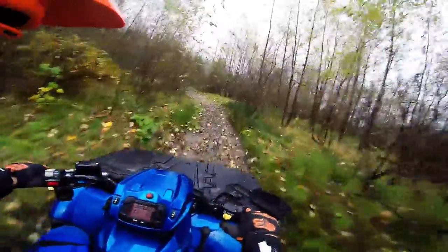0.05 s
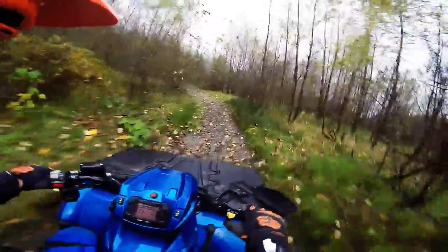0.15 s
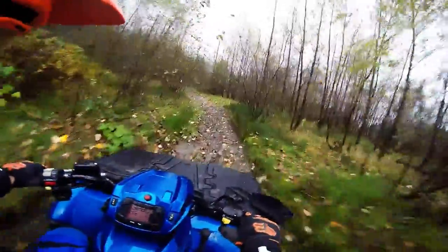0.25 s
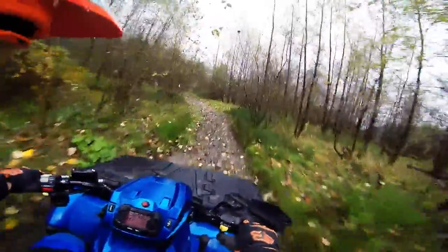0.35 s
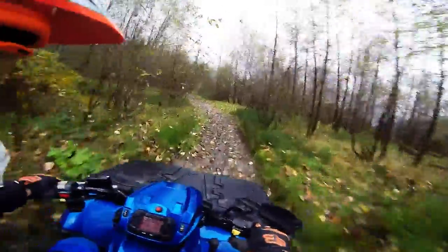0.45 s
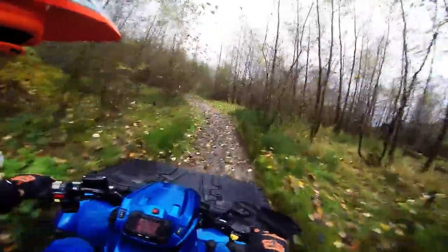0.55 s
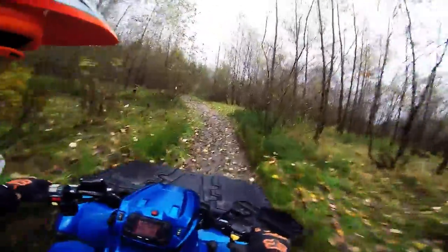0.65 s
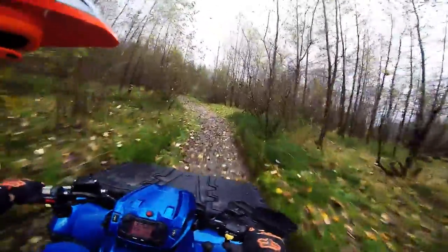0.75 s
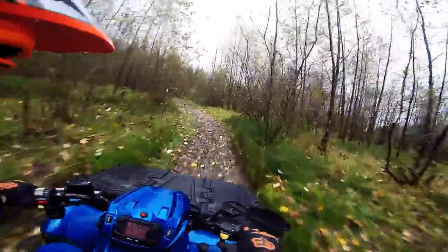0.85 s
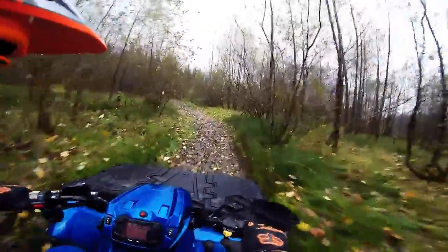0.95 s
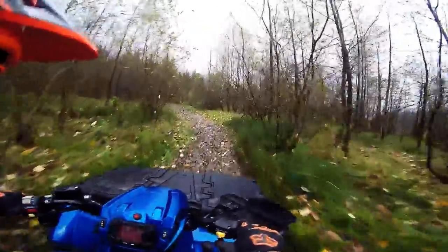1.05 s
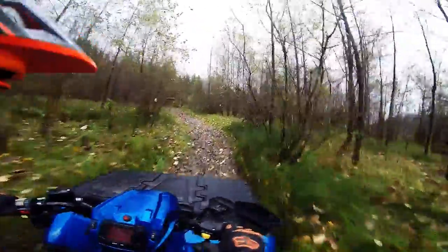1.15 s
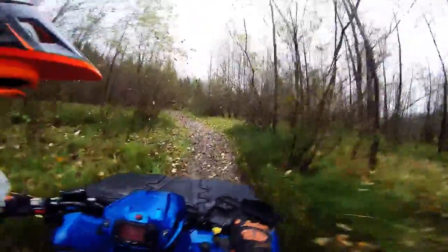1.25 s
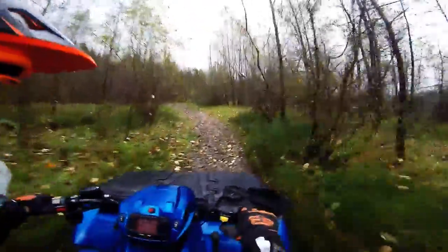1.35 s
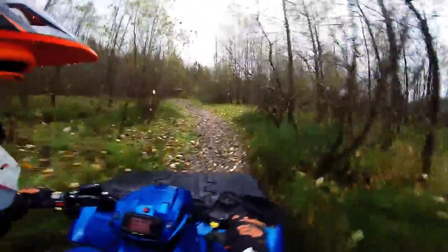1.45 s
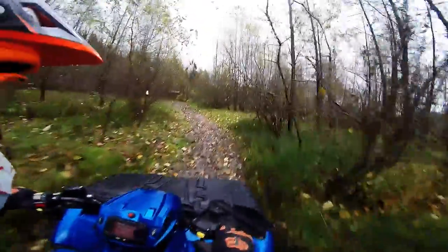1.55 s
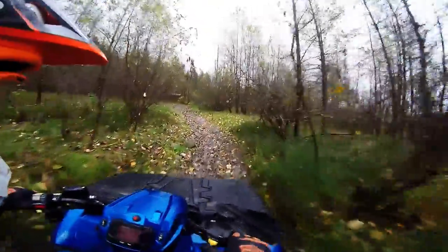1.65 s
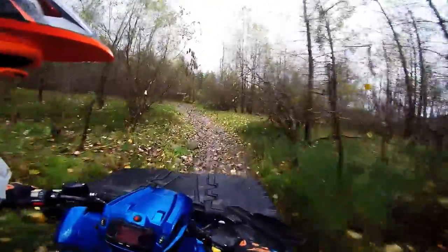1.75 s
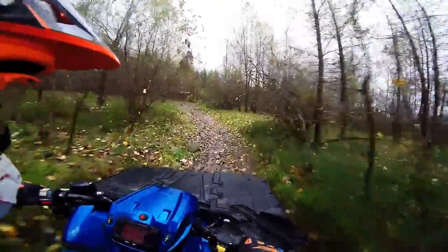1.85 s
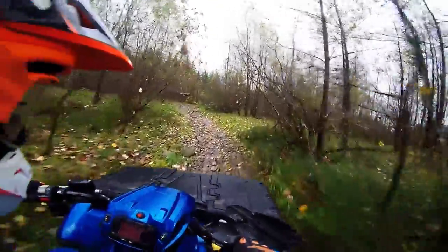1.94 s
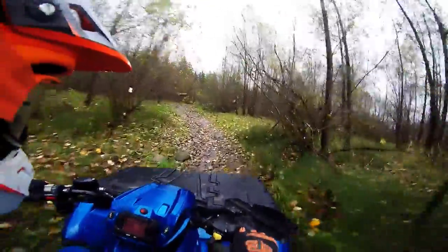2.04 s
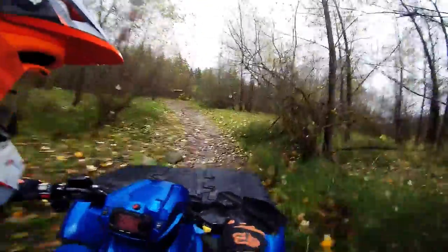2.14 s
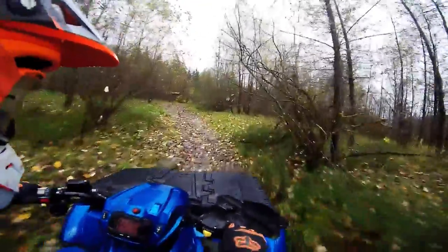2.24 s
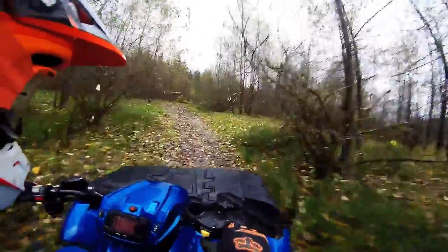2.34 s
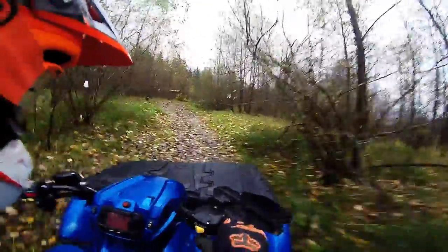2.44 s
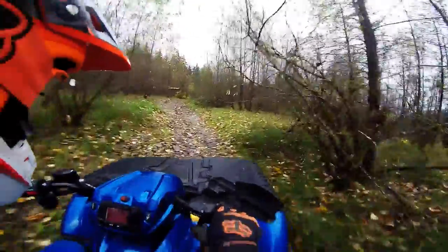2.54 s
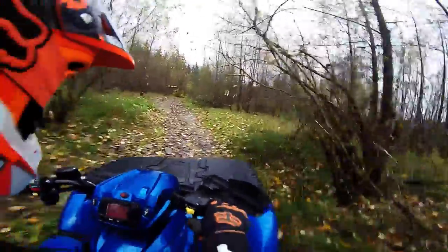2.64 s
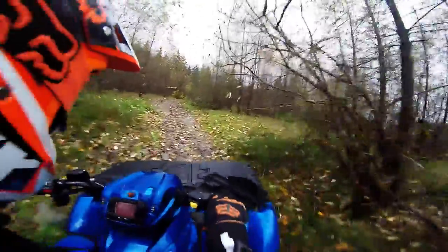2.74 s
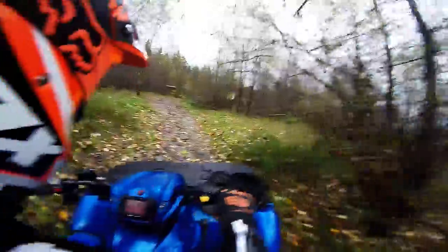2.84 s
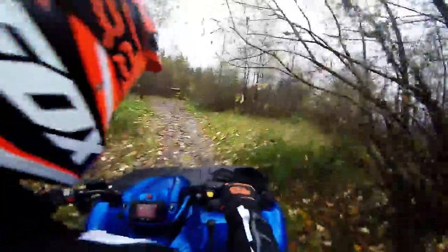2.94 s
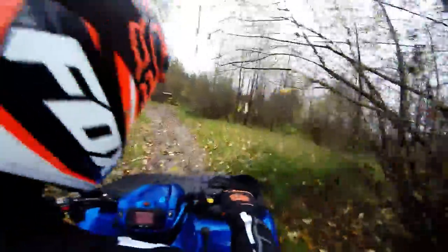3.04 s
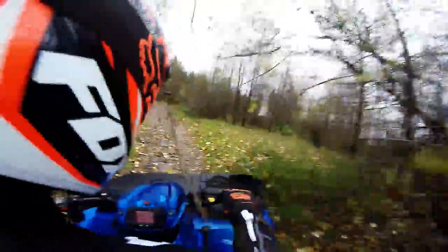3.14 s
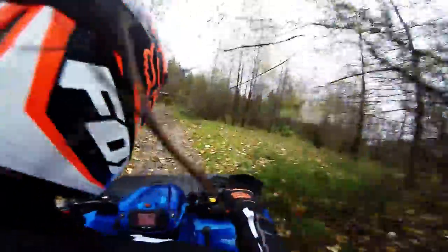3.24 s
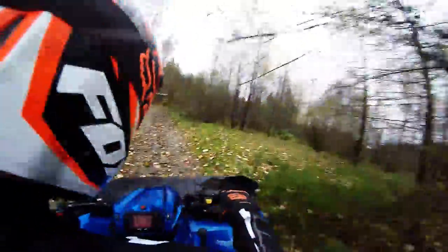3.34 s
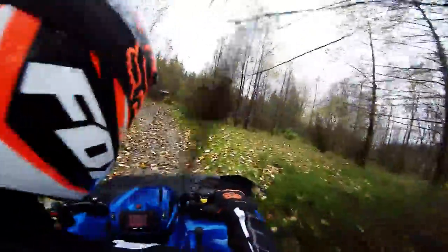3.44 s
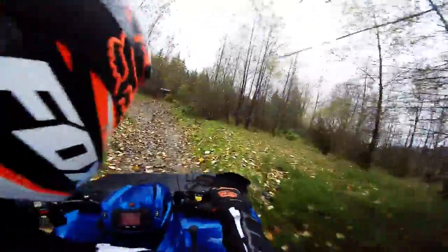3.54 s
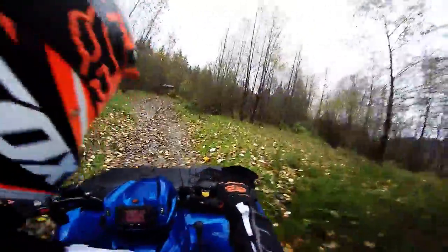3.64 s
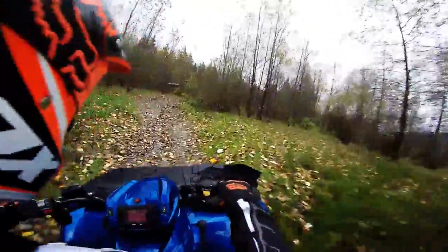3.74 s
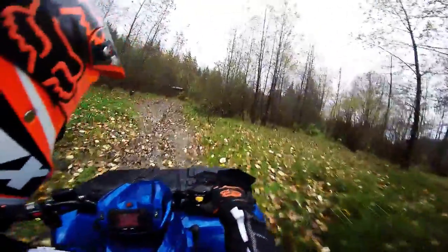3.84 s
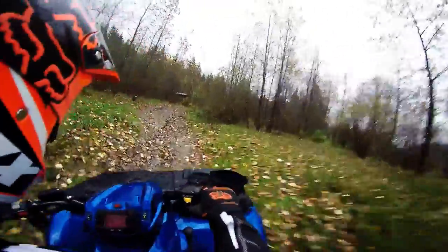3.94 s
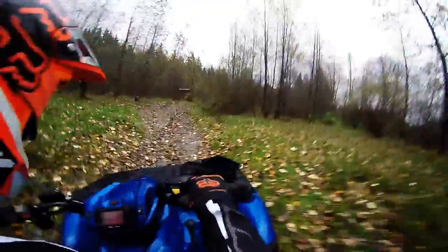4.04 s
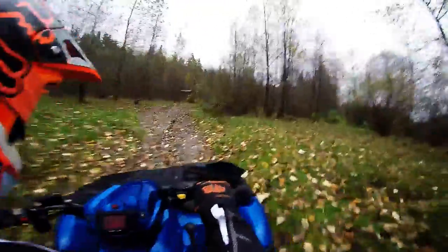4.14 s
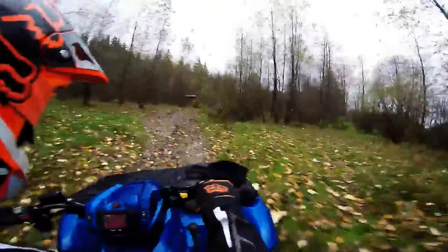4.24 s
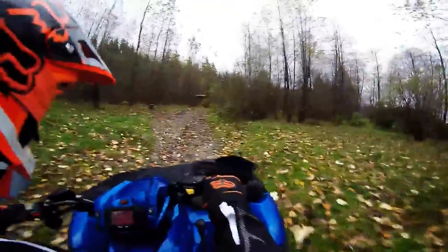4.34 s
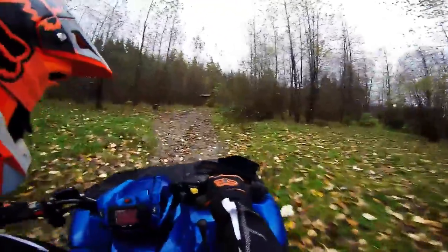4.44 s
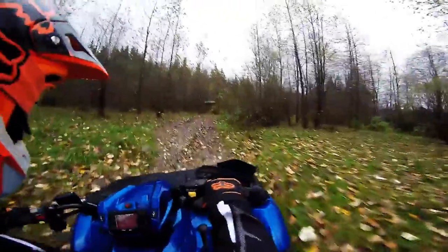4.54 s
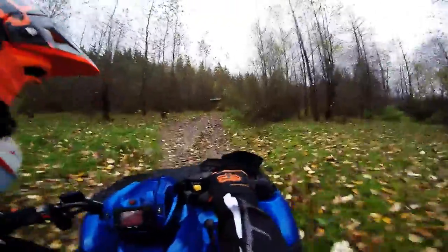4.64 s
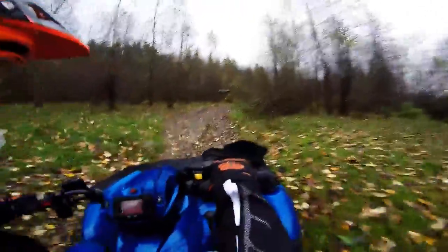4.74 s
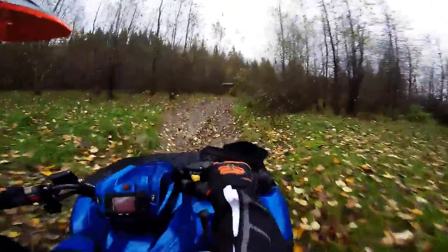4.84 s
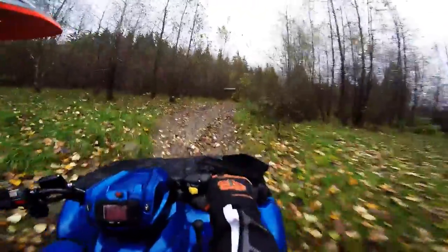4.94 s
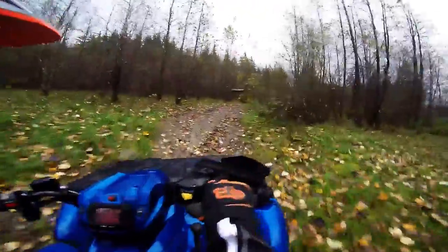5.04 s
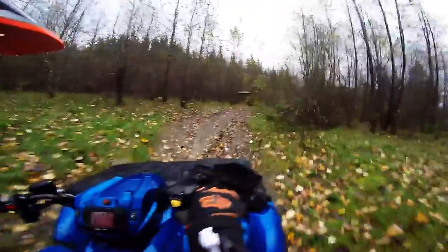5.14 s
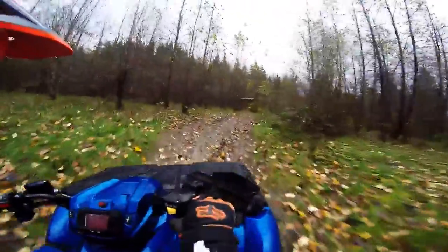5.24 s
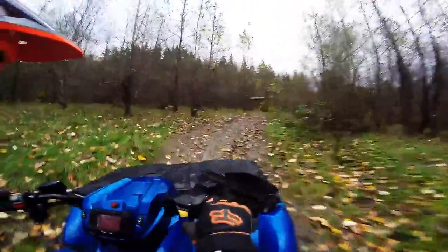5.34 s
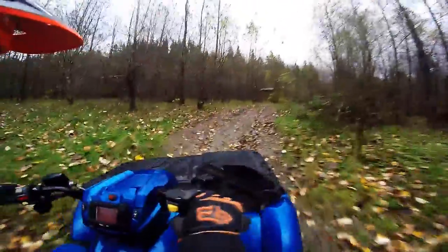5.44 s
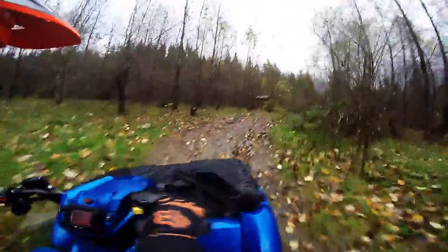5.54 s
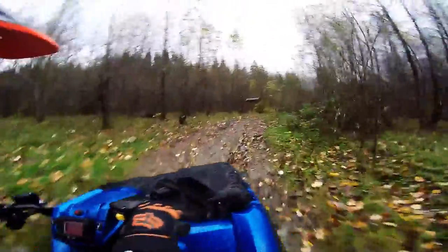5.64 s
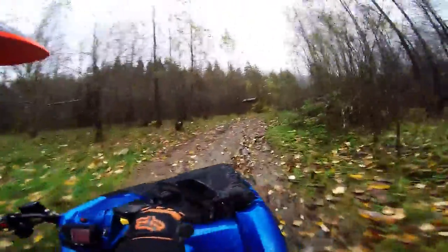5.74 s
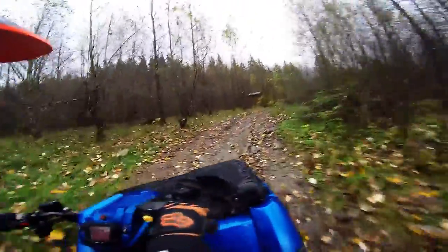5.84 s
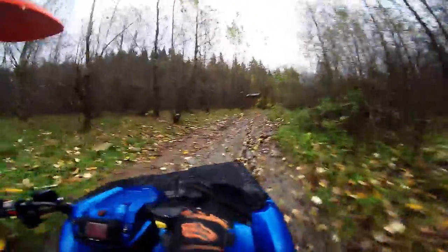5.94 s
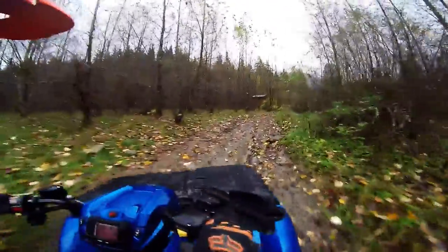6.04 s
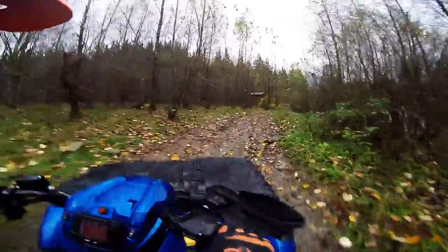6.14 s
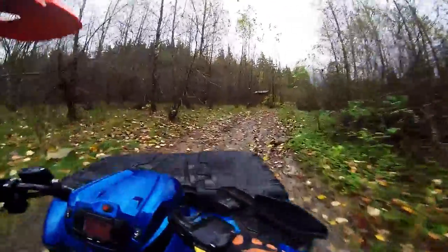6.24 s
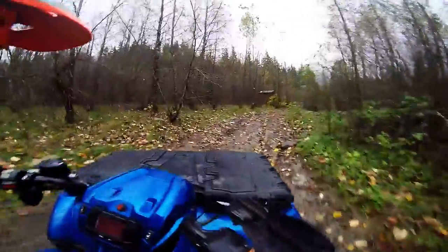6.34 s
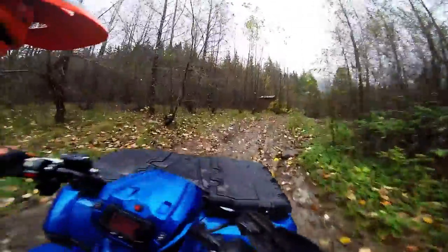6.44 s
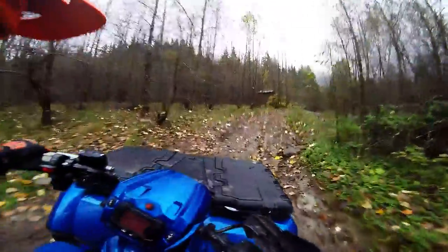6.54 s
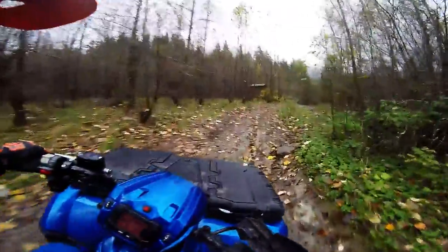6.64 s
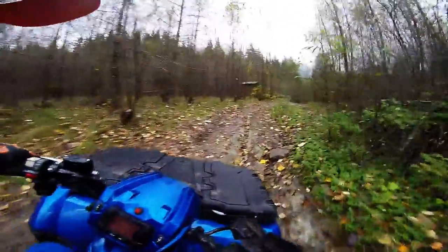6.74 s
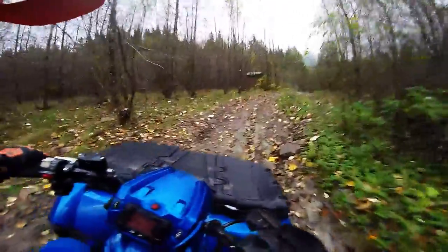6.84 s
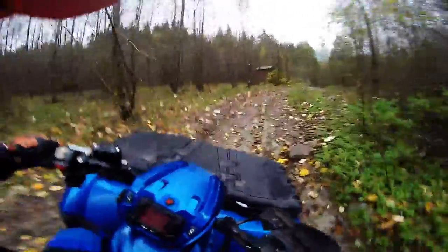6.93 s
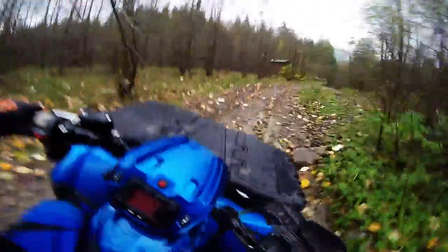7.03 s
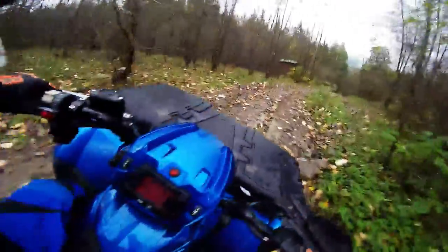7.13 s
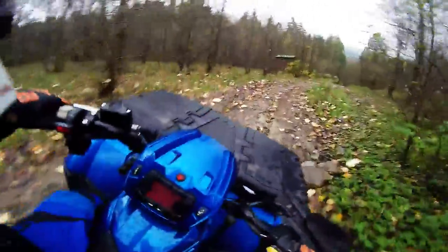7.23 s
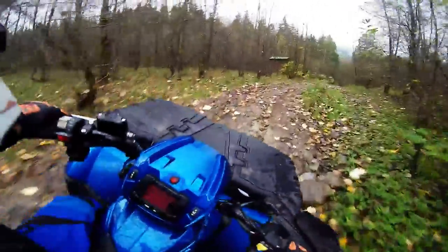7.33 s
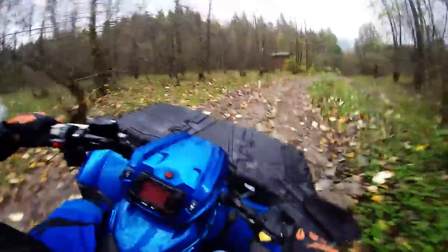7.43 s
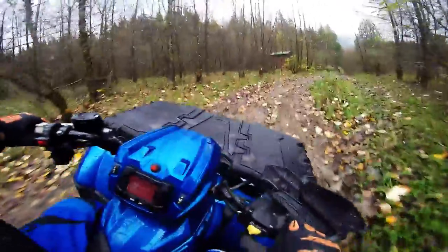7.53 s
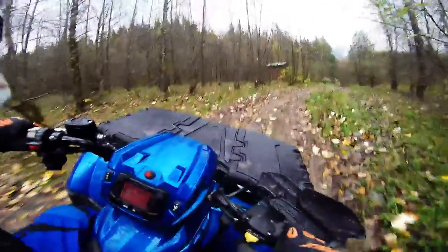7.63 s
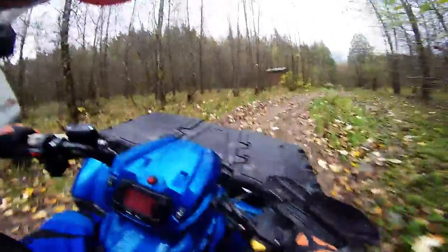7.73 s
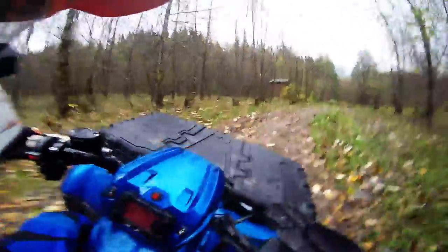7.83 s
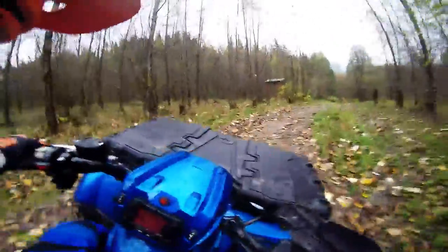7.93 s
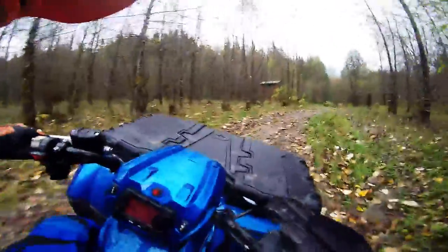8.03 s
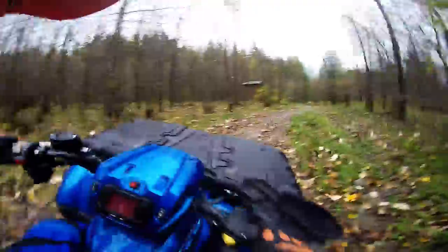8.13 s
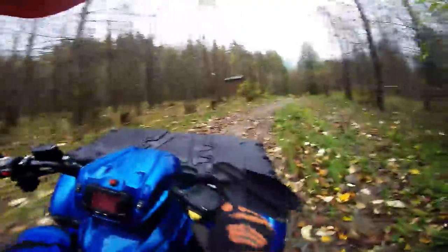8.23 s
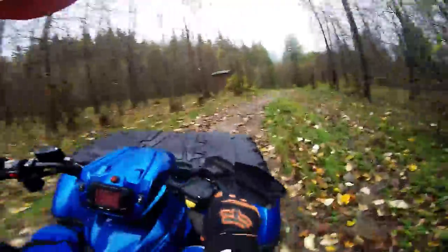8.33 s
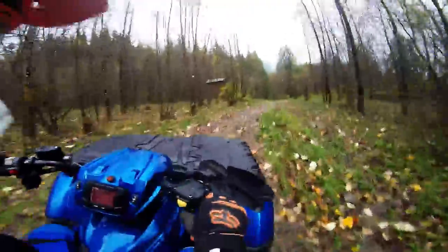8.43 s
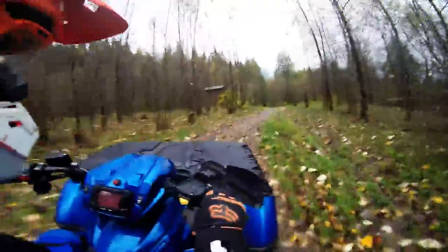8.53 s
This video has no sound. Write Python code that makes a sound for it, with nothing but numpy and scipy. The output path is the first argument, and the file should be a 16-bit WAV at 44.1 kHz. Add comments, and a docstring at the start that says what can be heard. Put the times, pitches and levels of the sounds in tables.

```python
"""A dirt trail, from a moving quad bike: a small camera in a closed plastic case beside the rider's helmet.
Exhaust orders hum over wind buffeting and suspension jolts; engine clatter hisses in the case's
resonances. Leaves brush past, close to the microphone. About three seconds in, a branch thuds on the
helmet and scrapes right over the case; the camera's gain control ducks and slowly recovers."""
import sys
import numpy as np
from scipy import signal
from scipy.fft import rfft, irfft, next_fast_len
from scipy.io import wavfile
from scipy.ndimage import uniform_filter1d, map_coordinates

SR = 44100
rng = np.random.default_rng(int(sys.argv[2]) if len(sys.argv) > 2 else 0)


def wrap_up_sound(samples):
    """Save the sound to the file named by the first command line argument, as 16-bit audio."""
    columns = np.atleast_2d(samples).T
    # keep every value between -1 and 1, then stretch to whole-number steps
    tamed = np.clip(columns, -1, 1)
    steps = np.round(tamed * 32767).astype(np.int16)
    wavfile.write(sys.argv[1], SR, steps)


N = 378378


def amp(db):
    """Gain of a level in dB."""
    return 10 ** (np.asarray(db) / 20)


def unit(x):
    """x brought to rms 1."""
    return x / np.sqrt(np.mean(x ** 2) + 1e-20)


def curves(rows):
    """One value per sample for each column after the time."""
    times, *columns = np.transpose(rows)
    return [np.interp(np.arange(N) / SR, times, column) for column in columns]


def wobble(rate):
    """A smooth random curve, rate knots a second."""
    knots = rng.standard_normal(int(N * rate / SR) + 4)
    at = np.arange(0, N + 32, 32)
    return np.interp(np.arange(N), at, map_coordinates(knots, [at * rate / SR]))


def patchy(depth_db):
    """White noise whose gain drifts in patches of time and frequency."""
    spectra = signal.stft(rng.standard_normal(N + 512), nperseg=512)[2]
    patches = uniform_filter1d(rng.standard_normal(spectra.shape), size=4, axis=0)
    patches = uniform_filter1d(patches, size=10, axis=1)
    return unit(signal.istft(spectra * amp(depth_db * unit(patches)), nperseg=512)[1][:N])


def filtered(x, response):
    """x through a complex frequency response."""
    size = next_fast_len(len(x) + 8192)
    return irfft(rfft(x, size) * response(np.fft.rfftfreq(size, 1 / SR)), size)[:len(x)]


def colour(points):
    """The response through (f/Hz, level/dB) points on a log frequency axis."""
    f, db = np.transpose(points)
    return lambda hz: amp(np.interp(np.log(hz + 1), np.log(f + 1), db))


def peak(f, hz, width):
    """One causal resonance at hz."""
    return 1j * f * width / (hz * hz - f * f + 1j * f * width)


def case(f):
    """Response of the plastic case round the microphone: modes of alternating sign."""
    # case resonances: f/Hz, width/Hz, level/dB
    modes = [(682, 310, -5.5), (1190, 253, 1.5), (1796, 244, -2.5), (2498, 188, 1.5), (2782, 170, -2),
             (3260, 360, -3.5), (4420, 217, -4.5), (4815, 96, -4), (5386, 400, -5), (6440, 500, -8),
             (7180, 450, -6), (9500, 3700, -11), (14700, 2100, -17)]
    return sum((-1) ** k * amp(db) * peak(f, hz, width) for k, (hz, width, db) in enumerate(modes))


def driven(hz, load_db, cruise_db, db_per_hz, load_slope, cruise_hz=26.5):
    """A gain that grows with revs and load."""
    return amp(cruise_db + db_per_hz * (hz - cruise_hz) + load_slope * load_db)


def exhaust(cycle, hz, load_db):
    """Multiples of the engine cycle rate hum through the pipe, each swaying in level and phase."""
    # orders before the pipe: multiple, level/dB, dB gained per dB of load
    orders = [(1, -43.5, 2.5), (2, -32, 0.13), (3, -44.5, 1.8), (4, -45, -0.3), (5, -31.5, 0.2),
              (6, -40, 0.26), (7, -49.5, 0), (8, -51, 2), (9, -59, .6), (10, -54.5, 0), (11, -61.5, .2),
              (12, -62, 0.5), (13, -62.5, -.2), (14, -57.5, .2), (16, -66, -1.5)]
    # pipe response: f/Hz, gain/dB
    pipe = [(50, -0.7), (64, 2), (80, -3.5), (97, 1.5), (130, 1.25), (155, -3.5), (182, -8), (210, -0.9),
            (250, 0.3), (270, 1.1), (305, -0.5), (370, -1.1), (420, -11.5), (450, -1.5)]
    hum = np.zeros(N)
    for k, db, load_slope in orders:
        sway_db = 0.2 * k ** 0.74 * wobble(7) + 0.9 * wobble(1.5)
        tone = np.sin(k * cycle + rng.uniform(0, 2 * np.pi) + 0.026 * k * wobble(9.8))
        hum += amp(db + load_slope * load_db + sway_db) * colour(pipe)(k * hz) * tone
    return np.sqrt(2) * hum


def whines(cycle, gear_order=42, hoot_order=20, mesh_order=100.5):
    """Two rough gear whines and a hoot follow the revs, fading in and out."""
    # thin tones: t/s, gear whine/dB, hoot/dB, high mesh whine/dB
    levels = [(0, -59, -62, -61), (.85, -57, -73, -65), (1.2, -67, -67, -58), (1.6, -56.5, -79, -62),
              (2.4, -62, -61, -61), (2.8, -71, -64.5, -57), (3.7, -73, -62.5, -65),
              (4.3, -53.5, -56.5, -47.5), (4.6, -61, -69, -48.5), (5.7, -53, -62, -51),
              (6.1, -55, -67, -53), (6.5, -60, -56.5, -61), (7.2, -60, -58, -54), (7.8, -70, -56, -49.5),
              (8.1, -59, -58, -50), (8.3, -70, -64, -52), (8.58, -54, -52, -44)]
    gear_db, hoot_db, mesh_db = curves(levels)
    gear = amp(gear_db) * (1 + 0.23 * wobble(35)) * np.sin(gear_order * cycle + 0.83 * wobble(22))
    hoot = amp(hoot_db) * (0.15 + wobble(25)) * np.sin(hoot_order * cycle + 2.5 * wobble(25))
    mesh = amp(mesh_db) * wobble(140) * np.sin(mesh_order * cycle + 1.3 * wobble(90))
    return np.sqrt(2) * (gear + hoot + mesh)


def wind():
    """Gusts buffet the case with a low, fluttering rumble."""
    # buffeting spectrum: f/Hz, relative level/dB
    spectrum = [(5, -11.5), (15, 3.5), (35, -2.5), (70, -7.5), (110, -17), (250, -22.5), (400, -39.5),
                (700, -43), (1200, -120)]
    # gust strength: t/s, level/dB
    gusts = [(0, -36), (1.05, -30.5), (1.3, -42), (1.7, -33.5), (2.2, -35), (2.4, -33), (2.6, -38),
             (2.9, -29.5), (4.7, -38), (5.12, -36), (5.44, -32), (5.81, -37.5), (6.25, -31.5), (6.45, -39),
             (6.9, -33.5), (7.22, -29), (7.68, -32), (8, -30), (8.58, -35.5)]
    flutter = amp(2.3 * wobble(7.7))
    return amp(curves(gusts)[0]) * unit(filtered(flutter * rng.standard_normal(N), colour(spectrum)))


def engine_roar(cycle, hz, load_db):
    """Midrange noise that throbs faintly with the engine cycle."""
    # roar spectrum: f/Hz, relative level/dB
    spectrum = [(180, -32), (300, 0.5), (366, 0), (398, -3), (570, -4.5), (782, -6.5), (1140, -2.5),
                (1800, -9), (2040, -44), (2200, -19.5), (2860, -33), (4840, -120)]
    throb_db = 1.1 * np.sin(cycle) + 0.59 * wobble(30)
    roar = unit(filtered(amp(throb_db) * patchy(depth_db=0.5), colour(spectrum)))
    return roar * driven(hz, load_db, cruise_db=-48, db_per_hz=0.24, load_slope=0.17)


def engine_clatter(cycle, hz, load_db):
    """Valve taps, gritty clicks and hiss pulsing at crank speed, heard through the case."""
    # metallic clatter spectrum: f/Hz, relative level/dB
    metal_band = [(900, -43), (1800, -10.5), (4000, -5.5), (5500, -15.5), (7000, -23), (9000, -40),
                  (12000, -91)]
    # hiss spectrum: f/Hz, relative level/dB
    hiss_band = [(3000, -35), (5500, -5), (8000, 0.5), (11000, -4), (12200, -6.5), (14000, -2.5),
                 (15200, -2), (15400, -70)]
    # clatter and hiss swell and sink together: t/s, gain/dB
    swell = [(0, 0.7), (1.2, -0.1), (1.5, 0), (2.9, -.4), (4.7, -0.8), (5.45, -.2), (5.8, 3), (6.1, 0.7),
             (6.9, -0.5), (7.2, 1.9), (7.7, 0.5), (8.15, 1), (8.58, 0.5)]
    grit = (rng.random(N) < 600 / SR) * rng.standard_normal(N) * 4  # about 600 clicks a second
    valves = np.diff(np.floor(cycle / np.pi * 2), prepend=0) * rng.normal(1, 0.23, N) * 9  # four a cycle
    beat = amp(0.45 * np.sin(2 * cycle) + 0.35 * wobble(45))
    clatter = beat * patchy(depth_db=1.52) + grit + valves
    clatter = unit(filtered(clatter, lambda f: colour(metal_band)(f) * case(f)))
    clatter *= driven(hz, load_db, cruise_db=-43.5, db_per_hz=0.37, load_slope=0.22)
    hiss = beat * rng.standard_normal(N) + 0.42 * grit
    hiss = unit(filtered(hiss, lambda f: colour(hiss_band)(f) * case(f)))
    hiss *= driven(hz, load_db, cruise_db=-58, db_per_hz=0.23, load_slope=0.071)
    return amp(curves(swell)[0]) * (clatter + hiss)


def leaves():
    """Leaves and twigs brush helmet and shoulder: short puffs of noise, heard through the case."""
    # brushes: t/s, level/dB, length/s, centre f/Hz
    brushes = [(0.342, -35, 0.011, 2540), (.3645, -25, 0.0012, 4000), (0.419, -36.5, .01, 2900),
               (0.508, -34, 0.0071, 3100), (1.012, -39.5, 0.0075, 2787), (1.029, -35.5, 0.023, 1410),
               (1.175, -42, 0.018, 4000), (1.823, -43, 0.0078, 4014), (2.931, -41.5, 0.048, 1310),
               (2.989, -37.5, 0.036, 1170), (3.033, -30, 0.0088, 780), (3.042, -35, 0.01, 1200),
               (3.236, -6, 0.0015, 800), (3.243, -30, 0.014, 940), (3.26, -28, 0.017, 1250),
               (3.72, -34, 0.052, 1136), (4.293, -43, 0.011, 1490), (4.841, -36, 0.018, 1298),
               (4.88, -33.5, 0.02, 1800), (7.562, -40, 0.0081, 1511)]
    out = np.zeros(N + SR)
    t = np.arange(SR // 8) / SR
    for start, db, length, hz in brushes:
        shape = (t / length) ** 0.19 * np.exp(-(t / length) ** 2)
        noise = shape * rng.standard_normal(len(t))
        puff = filtered(noise, lambda f: peak(f, hz, 1.05 * hz) ** 3 * case(f))
        out[round(start * SR):][:len(t)] += amp(db) * unit(puff) * np.sqrt(np.mean(shape ** 2))
    return out[:N]


def jolts():
    """Each bump comes through the suspension as a low swing that rings out in about two cycles."""
    # bumps: t/s, peak level/dB, f/Hz
    bumps = [(0.501, -22, 37), (.62, -27, 26), (1.06, -21.5, 38), (1.25, -22, 42), (3.052, -16.5, 59),
             (3.14, -15, 30.4), (3.2, -22, 35.2), (3.246, -14.5, 51.4), (3.271, -19.5, 35),
             (3.33, -13.5, 45), (4.75, -25, 30.3), (6.04, -20, 35), (6.92, -23.5, 28), (7.04, -15, 20),
             (7.3, -32, 24.5), (7.43, -16.5, 14), (7.84, -25, 24.6), (7.971, -17.5, 30)]
    out = np.zeros(N + SR)
    for at, db, hz in bumps:
        cycles = np.arange(-0.8, 2.5, hz / SR)
        shape = np.exp(-(cycles / np.where(cycles < 0, 0.35, 0.9)) ** 2)
        swing = shape * np.cos(2 * np.pi * cycles + 0.21)
        out[round((at - 0.8 / hz) * SR):][:len(swing)] += amp(db) * swing
    return out[:N]


def helmet_thuds(scatter_db=2.5):
    """Each blow of the branch rings the helmet shell's low, hollow modes, with a soft start."""
    # blows: t/s, level/dB, tilt/dB from each mode to the next higher
    blows = [(3.024, -14, 0.5), (3.041, -19, -2.5), (3.24, -10, -0.3), (3.289, -20, -0.5),
             (3.304, -22, -1.5), (3.325, -18, -6.5), (3.342, -16.5, 0), (3.366, -19, 7), (3.39, -17, -4),
             (3.448, -6, 3.5), (3.491, -5.5, 6.5), (3.733, -17.5, 1.5)]
    # shell modes: f/Hz, level/dB, t60/s
    modes = [(157.5, -1.5, 0.056), (192.5, -3, 0.046), (223, -5, 0.073), (265, -13.5, 0.03985)]
    out = np.zeros(N + SR)
    t = np.arange(SR // 4) / SR
    onset = (1 - np.exp(-t / 0.0023)) ** 2
    for start, db, tilt_db in blows:
        for k, (hz, mode_db, t60) in enumerate(modes):
            struck_db = db + mode_db + tilt_db * (k - (len(modes) - 1) / 2) + rng.normal(0, scatter_db)
            ring = amp(struck_db - 60 * t / t60) * np.sin(2 * np.pi * hz * t)
            out[round(start * SR):][:len(t)] += onset * ring
    return out[:N]


def rasp(force, hz, dull_db, bright_db):
    """Wood rubs the case: noise under a force envelope, in a dull band, one round hz and a bright one."""
    # wall modes that only direct contact excites: f/Hz, width/Hz, level/dB
    contact_modes = [(2260, 500, -5.5), (5724, 410, 3.5), (9200, 500, -4), (14000, 3800, 0)]
    wall = lambda f: case(f) * (1 + sum(amp(db) * peak(f, c, w) for c, w, db in contact_modes))
    out = np.zeros(len(force))
    for centre, width, db in [(720, 900, dull_db), (hz, 0.88 * hz, 0), (9500, 11000, bright_db)]:
        friction = force * rng.standard_normal(len(force))
        out += amp(db) * unit(filtered(friction, lambda f: wall(f) * peak(f, centre, width) ** 2))
    return np.sqrt(np.mean(force ** 2)) * out


def branch_slips(thin_end_s=3.38, snap_db=1.5, snap_t60=0.0024):
    """The branch catches and slips on the case: each crack is a hard snap over a longer body."""
    # slips: t/s, level/dB, t60/s, centre f/Hz, bright band/dB re the middle band
    slips = [(3.293, -17, .02, 3000, -9.5), (3.299, -4, 0.026, 2340, -22.5),
             (3.306, -13, 0.02, 2300, -19.5), (3.323, -3.5, 0.026, 4060, -16),
             (3.329, -11.5, .014, 5000, -6), (3.341, -5, 0.013, 5000, -7), (3.344, -8.5, 0.015, 4960, -7.5),
             (3.351, -8.5, .012, 4000, -19), (3.36, -3.5, .016, 3040, -5), (3.365, -5.5, .016, 3000, -12),
             (3.39, 8, 0.0077, 2800, -12), (3.402, -5, .012, 3000, -15), (3.404, -22, .011, 2800, -17),
             (3.416, -13, 0.012, 3000, -25), (3.44, -5.5, 0.013, 2800, -9), (3.449, 11, 0.013, 2440, -29),
             (3.458, 6.5, 0.011, 2770, -21), (3.466, 6, .031, 2400, -32), (3.475, 3, 0.026, 2390, -27),
             (3.481, -3.5, 0.016, 2500, -26), (3.485, 2, 0.029, 2430, -28), (3.493, 1, 0.017, 2480, -28.5),
             (3.502, 2, 0.022, 2500, -25), (3.51, 0.5, 0.0063, 2600, -21), (3.515, 0.5, 0.008, 5470, -12)]
    out = np.zeros(N + SR)
    t = np.arange(SR // 16) / SR
    for start, db, t60, hz, bright_db in slips:
        body = np.minimum(t / (0.066 * t60), 1) * amp(db - 60 * t / t60)
        snap = amp(db + snap_db - 60 * t / snap_t60)
        dull_db = -5 if start < thin_end_s else -25.5  # thick wood first, then the thin end
        out[round(start * SR):][:len(t)] += rasp(body + snap, hz, dull_db, bright_db)
    return out[:N]


def bark_drag(attack_s=0.0067, release_s=0.008):
    """Bark drags over the case between the slips, with a grainy, uneven force."""
    # strokes: t/s, length/s, level/dB, bright band/dB re the middle band
    strokes = [(3.29, 0.037, -24, -24), (3.331, .079, -19.5, -16), (3.447, .05, -14, -29),
               (3.499, 0.034, -36.5, 0.5)]
    out = np.zeros(N + SR)
    t = np.arange(SR // 8) / SR
    for start, length, db, bright_db in strokes:
        press = np.clip(np.minimum(t / attack_s, 1 + (length - t) / release_s), 0, 1)
        force = press * amp(db + 3 * wobble(245)[:len(t)])
        out[round(start * SR):][:len(t)] += rasp(force, hz=2540, dull_db=-6, bright_db=bright_db)
    return out[:N]


def scene():
    """Engine, wind, leaves, bumps and the branch, all at the one microphone beside the helmet."""
    # the engine: t/s, cycle f/Hz (half the crank speed), load/dB over cruising
    revs = [(0, 26.2, -4), (.48, 26.4, -4.5), (.81, 27.13, -3), (.95, 26.64, -2.5), (1.22, 27.07, 0.5),
            (1.38, 25.71, 1), (1.82, 26.73, 1.7), (2.18, 26.02, 2.2), (2.41, 26.94, 0.8), (2.55, 26.1, 0),
            (2.82, 25.4, 3), (3.11, 26.16, -7.5), (3.41, 25.66, -4), (3.56, 26.76, -4), (3.75, 26.55, -2),
            (4.18, 28.7, -0.5), (4.44, 28.85, -1), (4.58, 29.69, -0.5), (4.78, 29.54, .9),
            (5.15, 30.53, .9), (5.66, 30.35, .3), (5.95, 29.78, -0.5), (6.35, 29.54, 2.3),
            (6.65, 28.03, -0.5), (6.86, 28.06, -2), (6.98, 28.61, -1.5), (7.17, 28.9, -5),
            (7.5, 27.6, -2.5), (7.62, 28.38, -2.5), (7.91, 28.37, 0.5), (8.1, 28.15, 5), (8.43, 31.78, 3),
            (8.58, 32, 5.5)]
    hz, load_db = curves(revs)
    cycle = 2 * np.pi * np.cumsum(hz) / SR  # engine phase, one turn per cycle
    ride = exhaust(cycle, hz, load_db) + whines(cycle) + wind()
    ride += engine_roar(cycle, hz, load_db) + engine_clatter(cycle, hz, load_db)
    return (ride + leaves() + jolts() + helmet_thuds() + branch_slips() + bark_drag())[None]


def record(dry):
    """The camera's gain ducks on loud sound and climbs back steadily; peaks clip; the band ends steeply."""
    threshold_db, duck_slope, max_duck_db, recover_db_per_s = -17, 1.6, 11, 14.5
    top_hz = 16500
    power = uniform_filter1d(dry[0] ** 2, size=2048, origin=1023)
    level_db = 10 * np.log10(np.abs(power) + 1e-12)
    need_db = np.clip(duck_slope * (level_db - threshold_db), 0, max_duck_db)
    recovery_db = recover_db_per_s * np.arange(N) / SR
    duck_db = np.maximum.accumulate(need_db + recovery_db) - recovery_db
    duck_db = uniform_filter1d(duck_db, size=4096, origin=2047)
    ducked = dry[0] * amp(-duck_db)
    clipped = ducked / (1 + np.abs(ducked) ** 6) ** (1 / 6)
    return filtered(clipped, lambda hz: hz < top_hz)[None]


dry = scene()
out = record(dry)
wrap_up_sound(out)
```